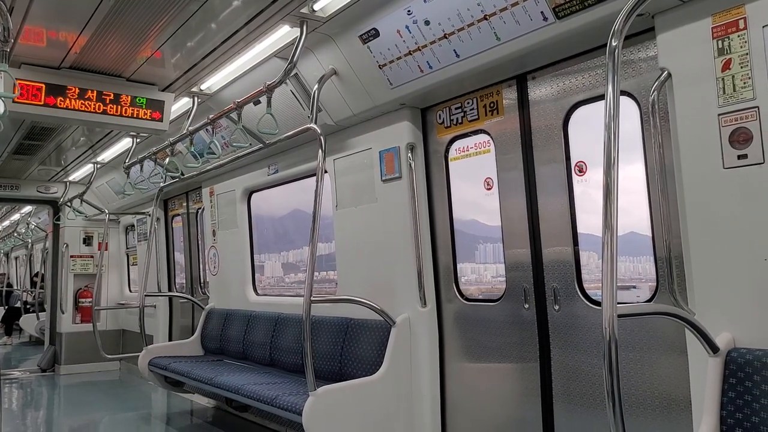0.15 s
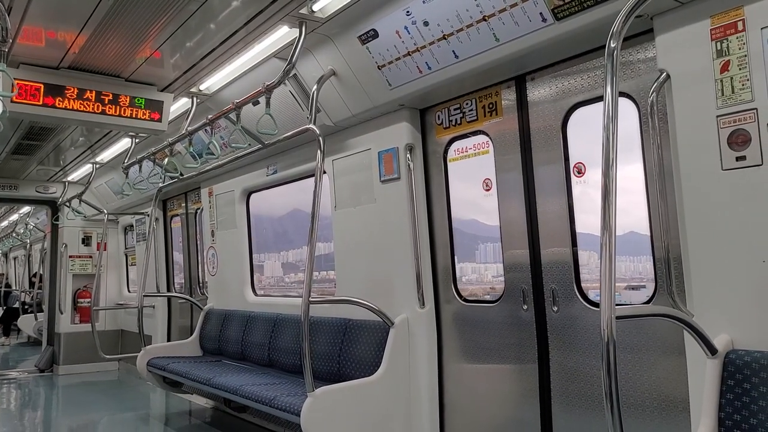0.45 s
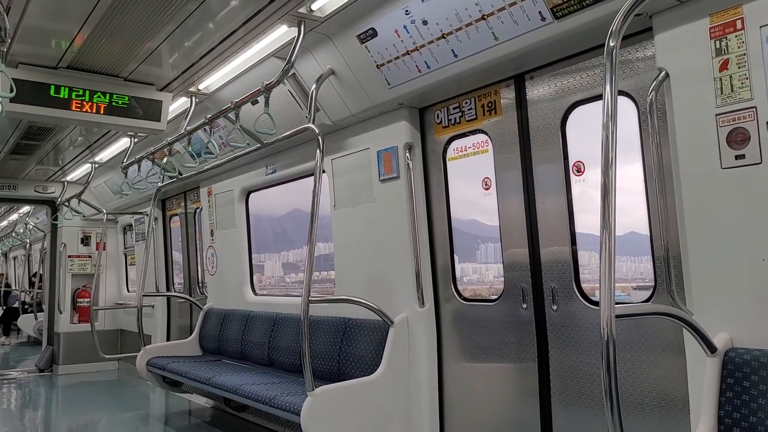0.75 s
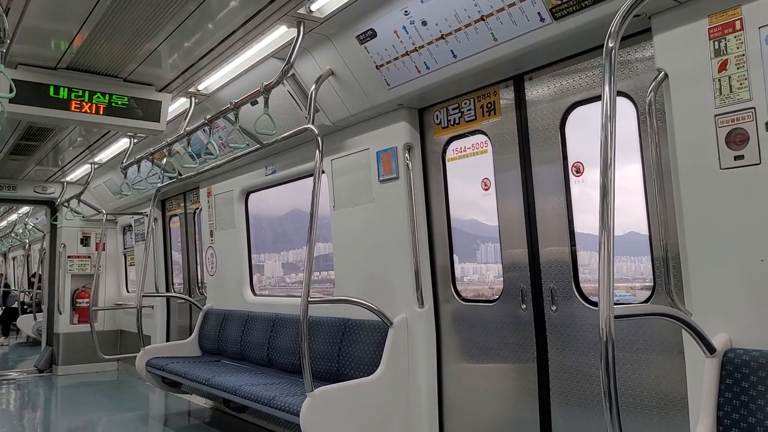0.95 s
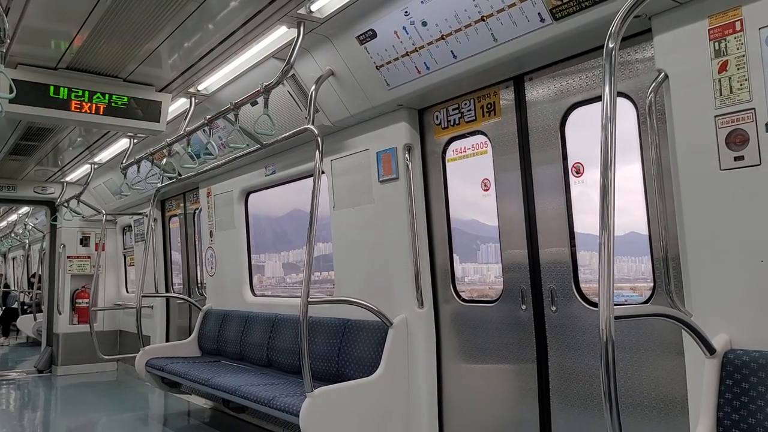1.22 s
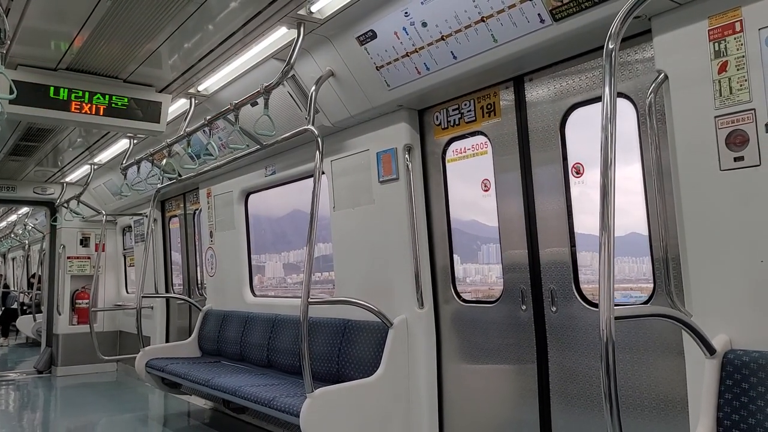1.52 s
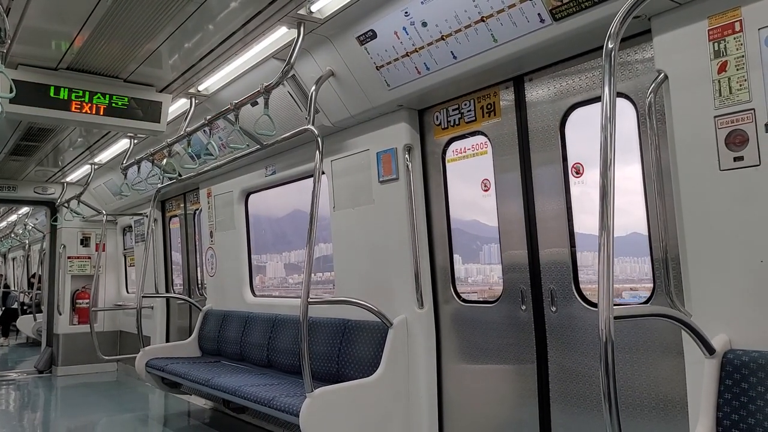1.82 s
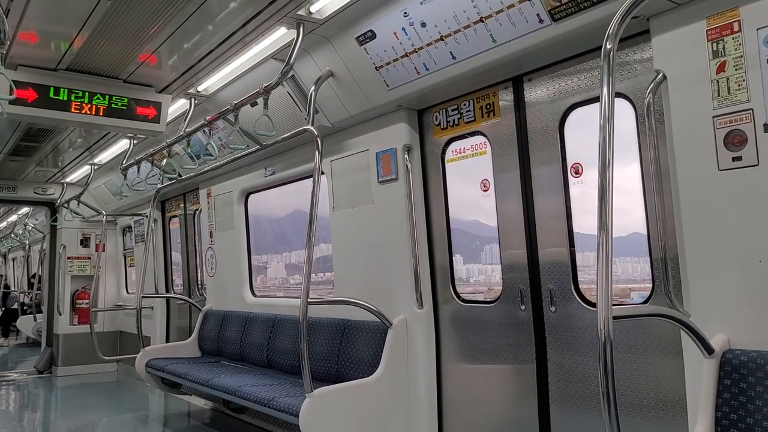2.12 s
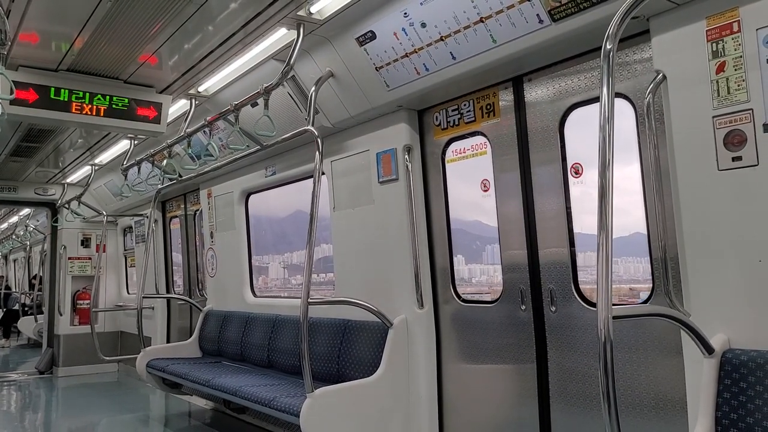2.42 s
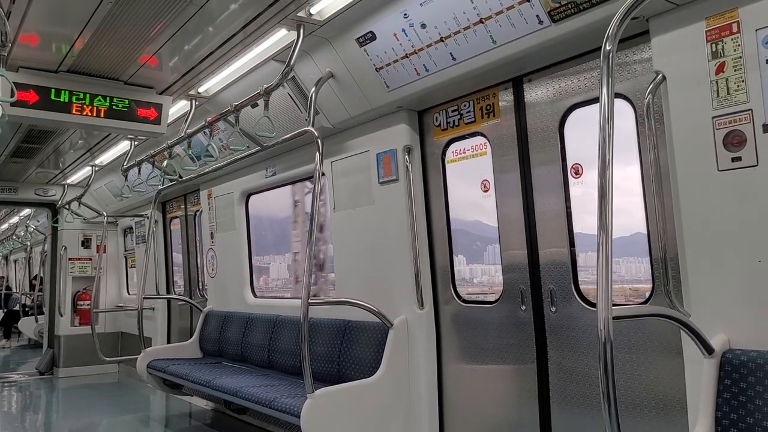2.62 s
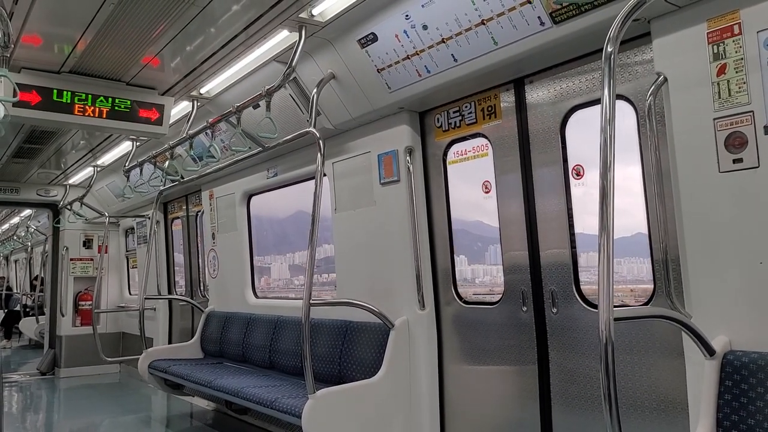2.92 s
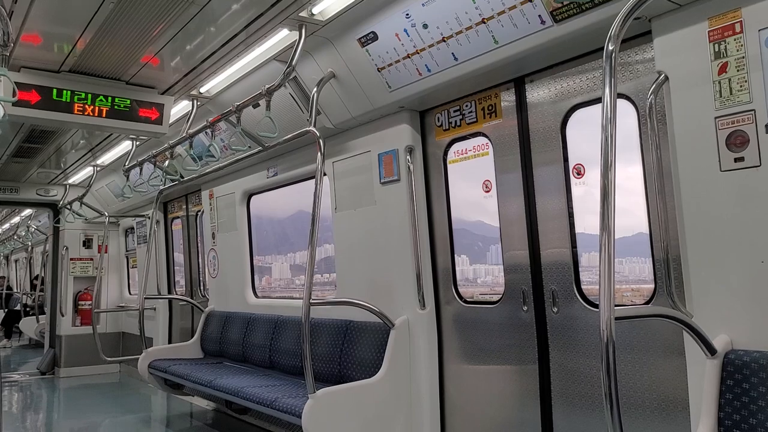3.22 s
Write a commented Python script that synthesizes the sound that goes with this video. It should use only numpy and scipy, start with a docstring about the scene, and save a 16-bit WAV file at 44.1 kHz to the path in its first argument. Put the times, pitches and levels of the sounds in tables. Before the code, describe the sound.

A metro train rumbles and roars along the rails, heard from inside the car.

```python
"""A deep boom and a rolling roar inside an almost empty metro car at steady speed between stations.
The body booms on its springs, rough rail makes the wheels roar through the floor panels,
and the wheels knock dully over joints. Steel rings faintly and loose fittings chatter;
under it all run the ventilation, a faint swish of outside air and a thin electrical buzz."""
import sys
import numpy as np
from scipy import signal
from scipy.fft import rfft, irfft
from scipy.io import wavfile
from scipy.ndimage import uniform_filter1d

SR = 44100
rng = np.random.default_rng(int(sys.argv[2]) if len(sys.argv) > 2 else 0)


def unload_audio(sound):
    """Save the sound as a 16-bit wav file, at the path given as the first command line argument."""
    columns = np.transpose(np.atleast_2d(sound))
    # keep every value between -1 and 1, then stretch to whole-number steps
    steps = np.round(np.clip(columns, -1, 1) * 32767)
    wavfile.write(sys.argv[1], SR, steps.astype(np.int16))


N = 147735


def undb(db):
    """Decibels to gain."""
    return 10 ** (np.asarray(db) / 20)


def glide(points):
    """Straight ramps through (time [s], value) points."""
    return np.interp(np.arange(N) / SR, *np.array(points).T)


def curve(points):
    """Fader ride through (time [s], level [dB]) points, as gain."""
    return undb(glide(points))


def bins():
    """Frequencies of the spectrum's bins, 1 Hz at the lowest."""
    return np.maximum(np.arange(N // 2 + 1) * SR / N, 1)


def colour(points):
    """EQ curve through (frequency [Hz], gain [dB]) points, rolling off below the first."""
    hz, db = np.array(points).T
    low_cut = np.minimum(bins() / hz[0], 1) ** 2
    return undb(np.interp(np.log(bins()), np.log(hz), db)) * low_cut


def resonances(rows):
    """EQ curve of steep-sided peaks (frequency [Hz], width [Hz], gain [dB])."""
    f = bins()
    peaks = (undb(db) / (1 + ((f / hz - hz / f) * hz / width / 2) ** 2) for hz, width, db in rows)
    return np.sqrt(sum(peak ** 2 for peak in peaks))


def reflections(depth_db=2.15, spacing_hz=16.7, full_from_hz=670):
    """EQ curve of narrow peaks and dips from the car's reflections, different left and right."""
    size = int(spacing_hz * N / SR)
    ripple = rng.standard_normal((2, N // 2 + 1))
    ripple = uniform_filter1d(uniform_filter1d(ripple, size), size)
    return undb(depth_db * ripple / ripple.std() * np.minimum(bins() / full_from_hz, 1))


def cabin_noise(eq):
    """Unit-level stereo noise shaped by an EQ curve and spread by the cabin's sound field."""
    # the cabin's stereo image (frequency [Hz], left-right correlation, left minus right [dB])
    field = [(45, 1, 0.5), (80, 1, 3.5), (127, 0.98, 4.5), (182, 0.88, 7.5), (208, 0.93, -4.5),
             (334, 0.65, 5.5), (432, 0.11, 1.5), (506, -0.49, 4.5), (618, -0.17, -1), (650, 0.049, 2.1),
             (1090, -0.57, 1.2), (1560, -0.53, 1.5), (2260, 0.18, 2), (2570, -0.25, 7.5),
             (2900, -0.096, 2.5), (3930, 0.097, 6), (4970, -0.21, 2.5), (7100, 0.028, 3),
             (9400, -0.069, -5), (12000, 0.018, -2.5), (15500, 0.0071, -1.5)]
    hz, likeness, lean_db = np.array(field).T
    likeness, lean_db = (np.interp(np.log(bins()), np.log(hz), v) for v in (likeness, lean_db))
    mid, side = rfft(rng.standard_normal((2, N)))
    sign = np.array([[1], [-1]])
    stereo = mid * np.sqrt(1 + likeness) + sign * side * np.sqrt(1 - likeness)
    noise = irfft(eq * undb(sign * lean_db / 2) * stereo, N)
    return noise / noise.std()


def wander(rate_hz):
    """Smooth random movement with a spread of one."""
    drift = irfft(rfft(rng.standard_normal(N)) / (1 + (bins() / rate_hz) ** 4), N)
    return drift / drift.std()


def sustained(sound, span_s):
    """Levels out a vibration's slow swells, leaving its quick beating."""
    power = np.mean(sound ** 2, axis=0)
    return sound / np.sqrt(uniform_filter1d(power, int(span_s * SR)))


def mode(hz, width_hz, span_s):
    """One resonance kept ringing at unit level; its pitch may glide."""
    centre = np.mean(hz)
    ring = sustained(cabin_noise(resonances([(centre, width_hz, 0)])), span_s)
    bend = np.exp(2j * np.pi * np.cumsum(np.zeros(N) + hz - centre) / SR)
    return np.real(signal.hilbert(ring) * bend)


def blows(hits, decay_s, attack_s=0.015):
    """Envelope of hits (time [s], level [dB]): each rises softly, then dies away."""
    t, power = np.arange(N) / SR, np.zeros(N)
    for start, db in hits:
        age = np.maximum(t - start, 0)
        rise = np.minimum(age / attack_s, 1)
        tail = np.exp(-np.maximum(age - attack_s, 0) / decay_s)
        power += (undb(db) * rise * tail) ** 2
    return np.sqrt(power)


def slipstream():
    """Air swishes faintly past the doors along the outside of the car."""
    # tone of the swish (frequency [Hz], gain [dB])
    swish_eq = [(3500, -5), (5200, -5), (6000, -1.5), (6800, -12), (11000, -11), (15500, -16)]
    # its swell and fade (time [s], level [dB])
    swish_level = [(0, -63), (.28, -62), (.35, -62), (.41, -56), (.48, -65), (.56, -65), (3.35, -76)]
    return cabin_noise(colour(swish_eq)) * curve(swish_level)


def electrical_buzz(ripple_hz=119.95, drift_hz=1.07, waver_db=4):
    """Harmonics of the power supply's ripple, each wavering in pitch and level."""
    # partials of the buzz (multiple of the ripple, level [dB], left minus right [dB])
    harmonics = [(6, -49.5, 1), (9, -60.5, -10), (10, -71, -13), (14, -57.5, -9.5), (15, -63, 9),
                 (16, -72, 20), (23, -80, 7), (30, -86, 5), (31, -79, 9)]
    phase = 2 * np.pi * np.cumsum(np.full(N, ripple_hz)) / SR
    buzz = 0
    for multiple, db, lean_db in harmonics:
        drift = 2 * np.pi * np.cumsum(drift_hz * wander(6.6)) / SR
        tone = np.sqrt(2) * np.sin(multiple * phase + drift + rng.uniform(0, np.pi, (2, 1)))
        pan_db = np.array([[lean_db], [-lean_db]]) / 2
        buzz += tone * undb(db + waver_db * wander(3.3) + pan_db)
    return buzz


def ventilation(rush_db=-34, mic_hiss_db=-59):
    """The vents lay down a steady bed of rushing air; faint microphone hiss lies on top."""
    # tone of the vents' rush and of the microphone hiss (frequency [Hz], gain [dB])
    rush_eq = [(20, -12), (100, 2.5), (170, -1.5), (400, 0.5), (750, -1.5), (1100, -6), (1600, -7),
               (2100, -12.5), (2600, -22.5), (3300, -22), (4200, -29.5), (5200, -35), (7000, -40),
               (10000, -43.5), (15000, -62)]
    mic_hiss_eq = [(1000, 4.5), (5000, -3), (7000, -5), (8700, -6.5), (11000, -2), (15500, -0.5)]
    rush = cabin_noise(colour(rush_eq) * reflections())
    mic_hiss = cabin_noise(colour(mic_hiss_eq))
    return undb(rush_db) * rush + undb(mic_hiss_db) * mic_hiss


def fittings():
    """Doors and loose fittings chatter briefly when jolted."""
    # tone of the chatter (frequency [Hz], gain [dB])
    rattle_eq = [(600, -41), (1100, 8), (1500, 0), (2300, -7), (3000, -10), (3800, -28), (6000, -27),
                 (15000, -55)]
    # bursts of chatter (time [s], level [dB])
    rattles = [(.012, -33.5), (.355, -34), (1.795, -52), (3.068, -32.5), (3.185, -42)]
    return cabin_noise(colour(rattle_eq)) * blows(rattles, decay_s=0.026)


def steel():
    """The rail rings at a wandering pitch, the wheels ring above it, and one of them whines."""
    # the rail's metallic ring (time [s], pitch [Hz], level [dB])
    rail_ring = [(0, 692, -42), (0.349, 701.4, -42), (.66, 751.4, -53), (.86, 761.6, -39.5),
                 (1.0, 733.2, -33.5), (1.12, 730, -37.5), (1.281, 684.3, -36), (1.421, 721.1, -44),
                 (1.56, 730.6, -54), (1.66, 702.6, -40), (1.78, 672.9, -38.5), (1.94, 724, -39),
                 (2.06, 676.5, -41), (2.301, 693, -47), (2.56, 717.8, -48), (2.86, 716.5, -36.5),
                 (3.0, 687.8, -42), (3.18, 678.8, -32.5), (3.35, 718, -45)]
    # resonances of the steel wheels (frequency [Hz], width [Hz], gain [dB])
    wheel_modes = [(1535, 71, 5), (2080, 170, -0.5), (2307, 36, -6), (2426, 29, -3), (2644, 26, -0.5),
                   (2911, 53, -1.5), (3020, 17, -7), (3698, 62, -12), (4370, 270, -18.5)]
    # swells of the wheels' ring and of the thin whine (time [s], level [dB])
    wheel_level = [(0, -45), (.4, -41), (.65, -43.5), (1.3, -48), (1.65, -49.5), (1.9, -47), (2.6, -48),
                   (3, -46.5), (3.18, -39.5), (3.35, -58)]
    whine_level = [(0, -63), (1.0, -73), (1.15, -65), (1.4, -72), (1.67, -63), (1.9, -78), (2.27, -64),
                   (2.5, -72), (3.0, -69), (3.17, -56), (3.35, -65)]
    rail_pitch = glide([(s, hz) for s, hz, _ in rail_ring])
    rail_gain = curve([(s, db) for s, _, db in rail_ring])
    rail = mode(rail_pitch, width_hz=38, span_s=0.12) * rail_gain
    whine = mode(hz=3705, width_hz=21, span_s=0.06) * curve(whine_level)
    wheels = cabin_noise(resonances(wheel_modes)) * curve(wheel_level)
    return rail + wheels + whine


def bogie_knocks():
    """Hard jolts knock the bogie against the body with a short hollow note."""
    # the knocks (time [s], level [dB])
    knocks = [(.112, -27.5), (3.14, -35)]
    return mode(hz=283, width_hz=24, span_s=0.04) * blows(knocks, decay_s=0.035)


def rail_joints(thud_decay_s=0.037, clatter_decay_s=0.041, bass_lag_s=0.031, bass_db=-3.5):
    """Wheels drop over joints: a muffled clatter, a panel thud, then its slower bass in the floor."""
    # wheels crossing joints (time [s], thud level [dB], clatter level [dB])
    crossings = [(0.086, -40, -27), (0.114, -32.5, -46), (.235, -31.5, -41), (.275, -46, -33),
                 (0.329, -42, -23), (.41, -38, -29.5), (0.451, -30, -26.5), (0.837, -38, -28.5),
                 (.955, -34, -30), (1.033, -32, -35), (1.175, -33, -28.5), (1.267, -31.5, -30),
                 (1.325, -35, -36), (1.761, -35, -33.5), (1.865, -34, -30), (1.961, -30.5, -29.5),
                 (2.127, -31, -30), (2.2, -33, -30), (2.365, -38, -32), (2.695, -27.5, -26.5),
                 (2.81, -34, -27.5), (2.908, -32, -29), (3.057, -38, -26.5), (3.143, -28.5, -23.5),
                 (3.19, -33, -29), (3.235, -31, -38)]
    # tone of each layer of the hit (frequency [Hz], gain [dB])
    thud_eq = [(150, -11.5), (200, -0.5), (290, -1), (380, 3.5), (520, -20.5), (1000, -42), (8000, -82)]
    bass_eq = [(35, -16), (70, -18), (105, 6.5), (135, 5.5), (180, -28), (400, -52), (3000, -100)]
    clatter_eq = [(200, -31), (380, -4), (500, 6), (720, 1.5), (880, -4), (1150, -5), (1900, -19.5),
                  (3000, -44), (6000, -48), (15000, -66)]
    thud_hits = [(s, db) for s, db, _ in crossings]
    bass_hits = [(s + bass_lag_s, db + bass_db) for s, db in thud_hits]
    clatter_hits = [(s, db) for s, _, db in crossings]
    thud = sustained(cabin_noise(colour(thud_eq)), span_s=0.049) * blows(thud_hits, thud_decay_s)
    bass = sustained(cabin_noise(colour(bass_eq)), span_s=0.048) * blows(bass_hits, thud_decay_s)
    clatter = cabin_noise(colour(clatter_eq)) * blows(clatter_hits, clatter_decay_s)
    return thud + bass + clatter


def rolling(flutter_db=2, panels_db=-6):
    """Rough rail makes the wheels roar with a quick flutter and sets the wall panels droning."""
    # tone of the roar (frequency [Hz], gain [dB])
    roar_eq = [(60, 5), (120, -5), (160, -3.5), (290, -0.5), (440, 0), (520, 3.5), (600, -2.5), (700, -1),
               (800, 1.5), (1000, -7), (1300, -12), (1700, -14.5), (2200, -15.5), (3000, -29), (4500, -43),
               (7000, -49), (15000, -60)]
    # roughness of the rail, riding the roar and the lesser panel modes (time [s], level [dB])
    roughness = [(0, -33), (.25, -29), (.36, -27), (.55, -34.5), (.72, -37.5), (.9, -33), (1.12, -35),
                 (1.3, -31), (1.48, -34), (1.69, -39.5), (1.8, -30), (2.08, -34.5), (2.22, -29.5),
                 (2.52, -35), (2.69, -35.5), (2.85, -29), (3.02, -30), (3.2, -31), (3.35, -30.5)]
    # lesser panel modes (frequency [Hz], width [Hz], gain [dB])
    panel_modes = [(223, 8.2, 0), (358.6, 58, -6), (390, 7.9, -1.5)]
    # drone of the strongest panel mode (time [s], level [dB])
    drone_level = [(0, -55), (.17, -39), (.28, -39), (.38, -31), (.43, -39), (.5, -29), (.62, -45.5),
                   (1.0, -39), (1.18, -37.5), (1.29, -31.5), (1.46, -47), (1.58, -43), (1.68, -31.5),
                   (1.79, -31.5), (1.9, -43), (2.0, -36), (2.11, -39), (2.15, -35.5), (2.24, -30),
                   (2.38, -40), (2.52, -38.5), (2.68, -52), (2.705, -27.5), (2.78, -34), (2.85, -31.5),
                   (2.98, -40), (3.13, -38), (3.2, -29.5), (3.28, -33.5), (3.35, -38)]
    # its bend as the load shifts (time [s], pitch [Hz])
    drone_pitch = [(0, 353.9), (.3, 348), (.5, 334.2), (1.1, 356.3), (1.35, 344.2), (1.64, 332.6),
                   (1.78, 357.2), (1.95, 346.4), (2.3, 342.5), (2.8, 339.1), (3.35, 339)]
    flutter = undb(flutter_db * wander(19.3))
    roar = cabin_noise(colour(roar_eq) * reflections()) * flutter
    panels = undb(panels_db) * sustained(cabin_noise(resonances(panel_modes)), span_s=0.063)
    drone = mode(glide(drone_pitch), width_hz=8, span_s=0.021) * curve(drone_level)
    return (roar + panels) * curve(roughness) + drone


def body_boom():
    """The car body shakes on its springs and the floor drums in two modes above it."""
    # deep resonances of the body (frequency [Hz], width [Hz], gain [dB])
    body_modes = [(25, 5.6, -13), (36, 14, -7.5), (45.2, 9.9, 1)]
    # surges of the shake and of the lower and upper floor modes (time [s], level [dB])
    shake_level = [(0, -25), (.06, -27), (.2, -29), (.33, -20), (.42, -36), (.51, -20), (.6, -29.5),
                   (.8, -34), (1.05, -29.5), (1.35, -36), (1.55, -30), (1.8, -37), (1.91, -21.5),
                   (2.03, -28), (2.12, -36), (2.25, -24.5), (2.55, -31.5), (2.85, -36), (3.03, -29),
                   (3.16, -29.5), (3.27, -26.5), (3.35, -31)]
    lower_level = [(0, -27), (.1, -34), (.17, -23), (.28, -30), (.36, -45), (.45, -25), (.53, -42),
                   (.66, -46), (.73, -27), (.82, -31), (.92, -40), (1.03, -31), (1.12, -46), (1.19, -24.5),
                   (1.31, -28.5), (1.43, -38), (1.8, -43), (2, -34), (2.1, -47), (2.27, -31), (2.6, -32.5),
                   (2.74, -30.5), (2.81, -46), (2.93, -31), (3.06, -42.5), (3.35, -38.5)]
    upper_level = [(0, -40), (.15, -24), (.22, -34), (.31, -30.5), (.41, -31), (.6, -40.5), (.8, -36),
                   (1.0, -38), (1.26, -35.5), (1.39, -26), (1.47, -38.5), (1.8, -44), (1.9, -31),
                   (1.98, -28.5), (2.06, -40), (2.24, -42), (2.4, -44), (2.76, -50), (2.83, -27),
                   (2.94, -41), (3.02, -34), (3.12, -35.5), (3.35, -55)]
    shake = sustained(cabin_noise(resonances(body_modes)), span_s=0.05) * curve(shake_level)
    lower = mode(hz=72.5, width_hz=7.6, span_s=0.06) * curve(lower_level)
    upper = mode(hz=94.4, width_hz=7.1, span_s=0.12) * curve(upper_level)
    return shake + lower + upper


def scene():
    """The full mix from a seat in the car: the ride over a bed of buzz and air."""
    ride = body_boom() + rolling() + steel() + rail_joints() + bogie_knocks() + fittings()
    return ride + electrical_buzz() + ventilation() + slipstream()


def record(dry):
    """A steep low-pass takes off the very top."""
    cutoff_hz = 15750
    return signal.sosfilt(signal.ellip(10, 0.1, 80, cutoff_hz, fs=SR, output="sos"), dry)


dry = scene()
out = record(dry)
unload_audio(out)
```